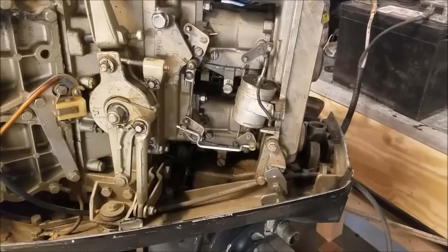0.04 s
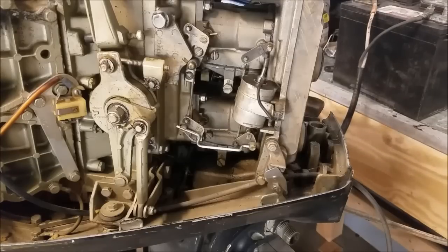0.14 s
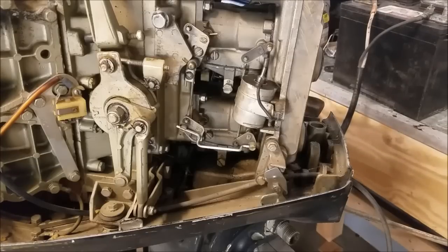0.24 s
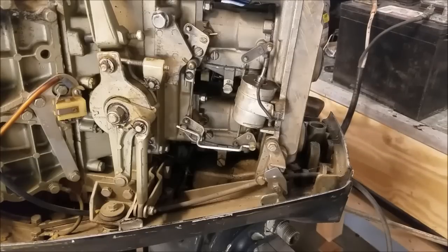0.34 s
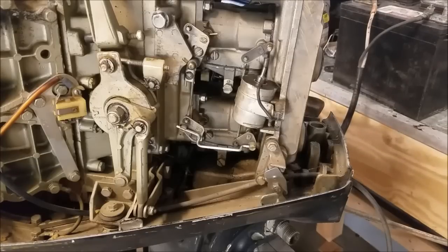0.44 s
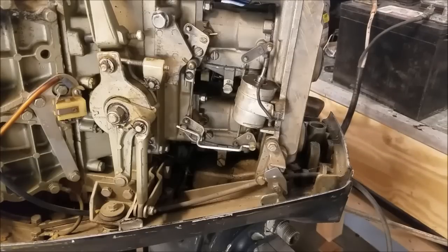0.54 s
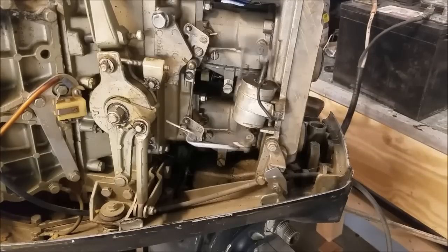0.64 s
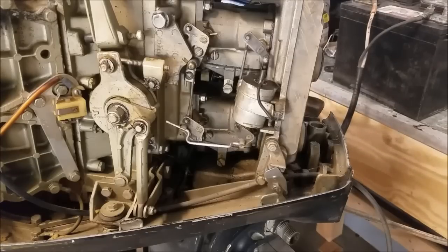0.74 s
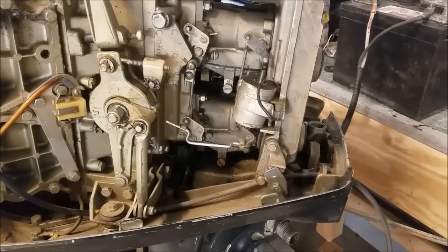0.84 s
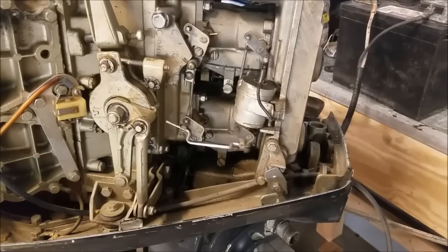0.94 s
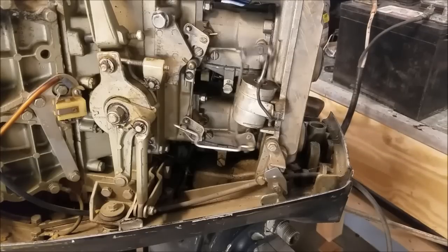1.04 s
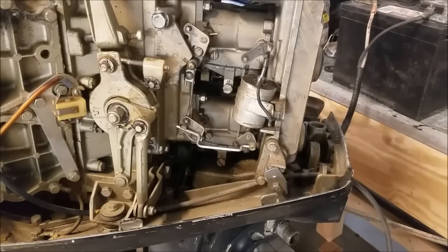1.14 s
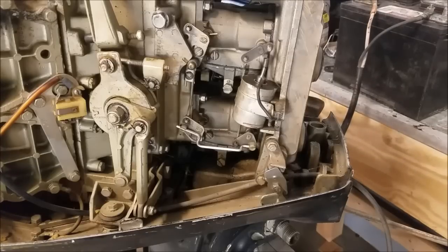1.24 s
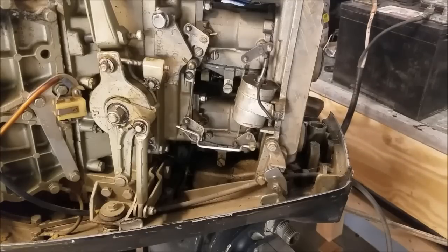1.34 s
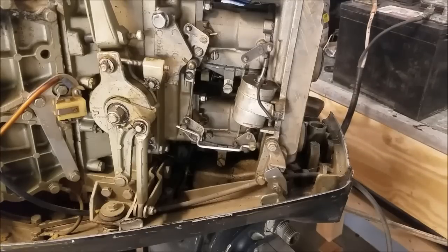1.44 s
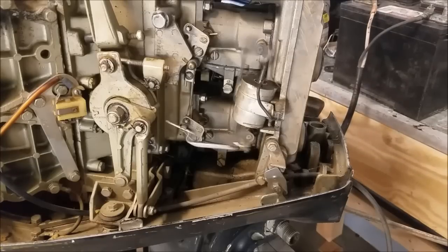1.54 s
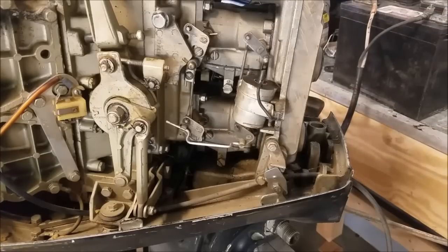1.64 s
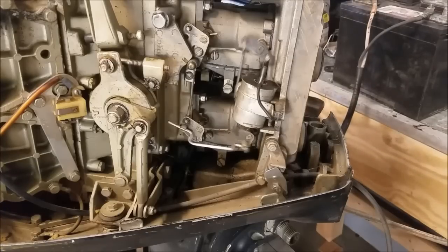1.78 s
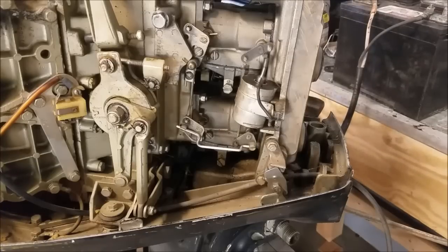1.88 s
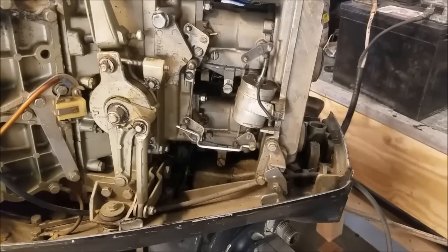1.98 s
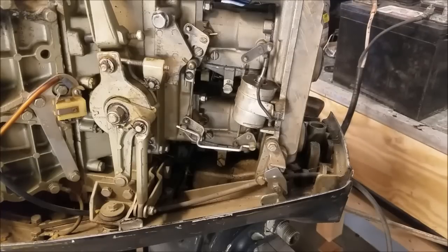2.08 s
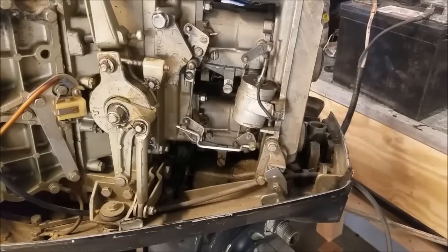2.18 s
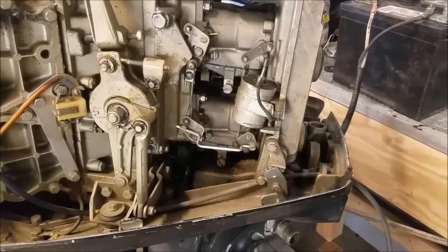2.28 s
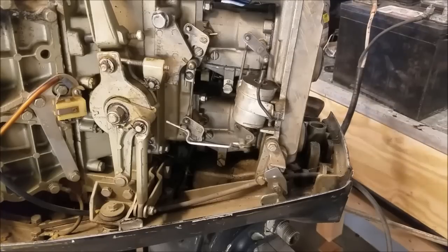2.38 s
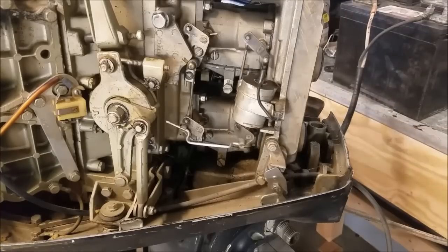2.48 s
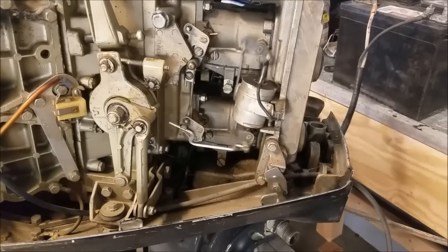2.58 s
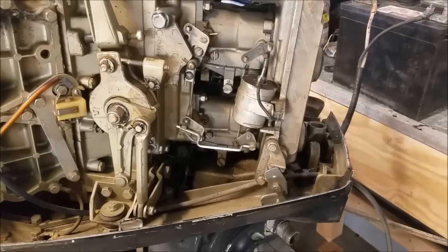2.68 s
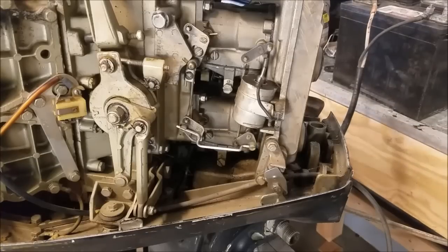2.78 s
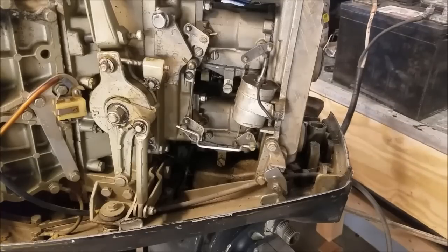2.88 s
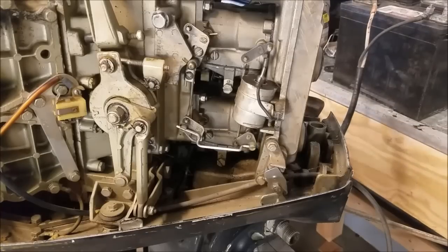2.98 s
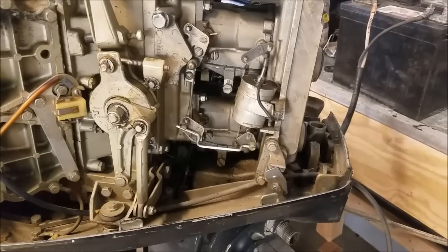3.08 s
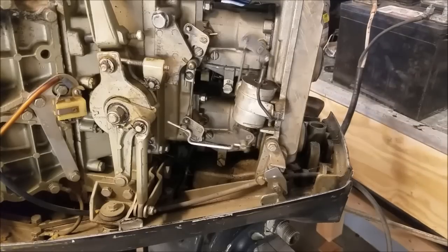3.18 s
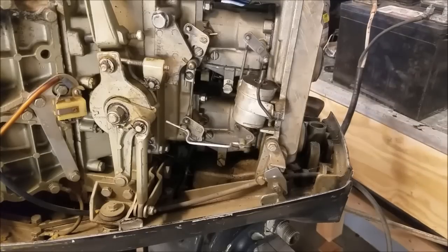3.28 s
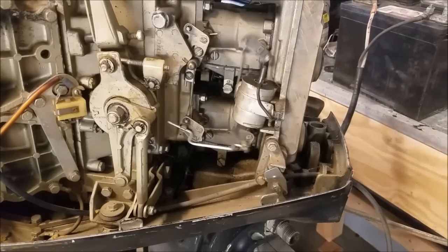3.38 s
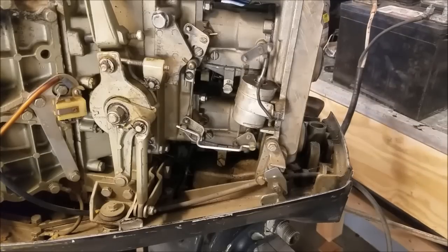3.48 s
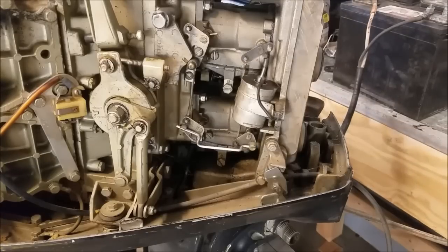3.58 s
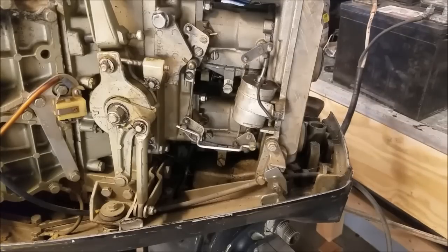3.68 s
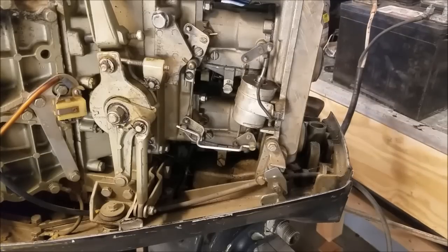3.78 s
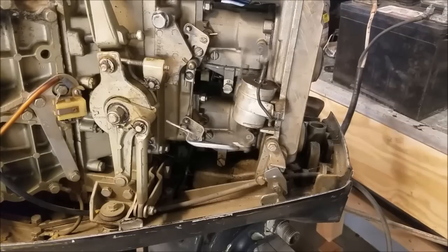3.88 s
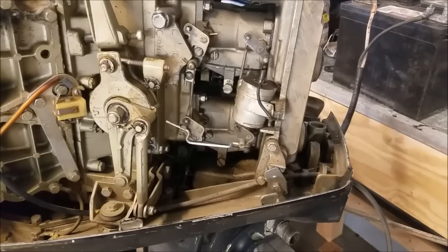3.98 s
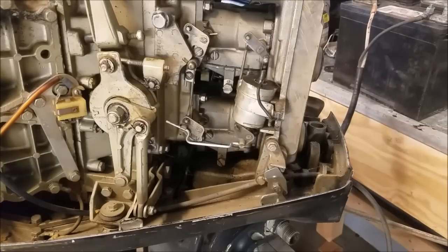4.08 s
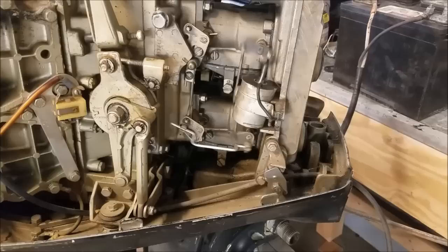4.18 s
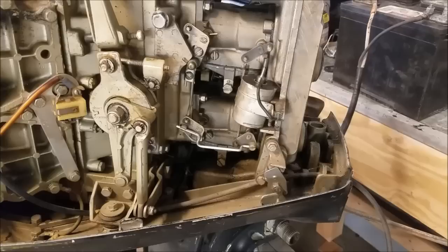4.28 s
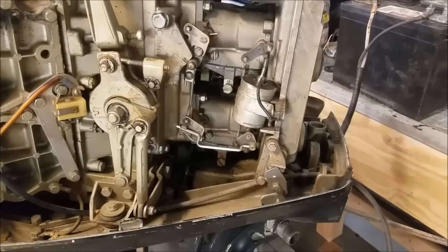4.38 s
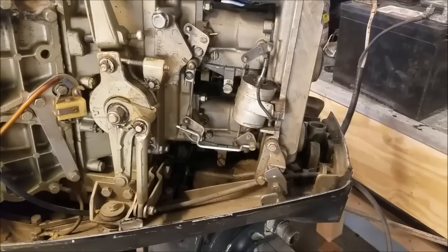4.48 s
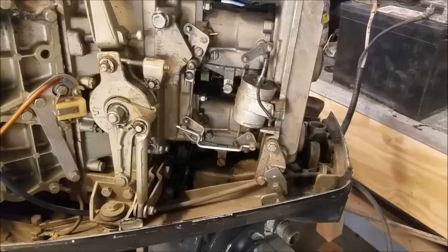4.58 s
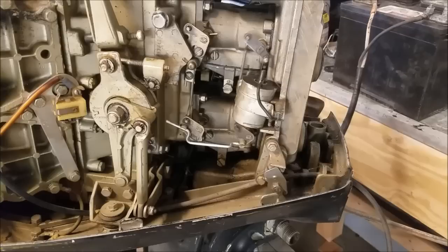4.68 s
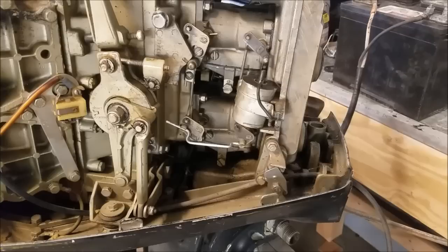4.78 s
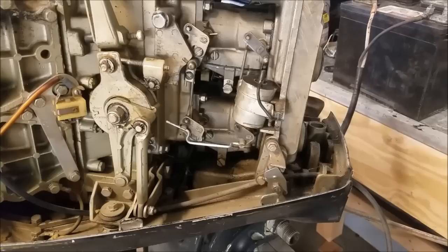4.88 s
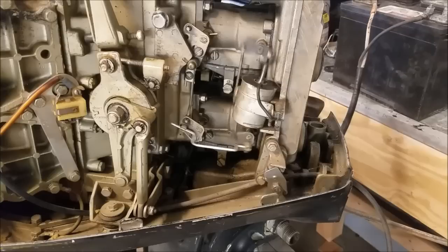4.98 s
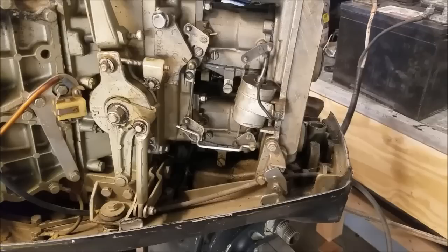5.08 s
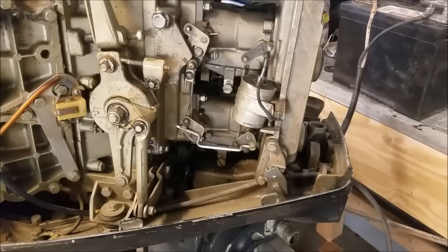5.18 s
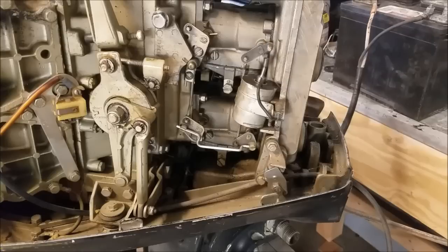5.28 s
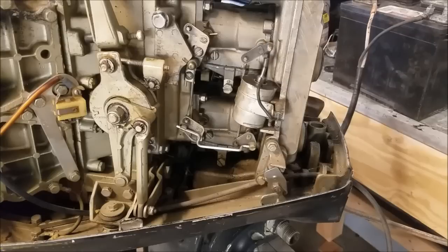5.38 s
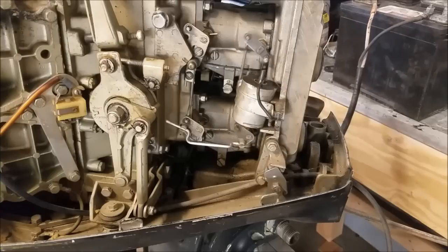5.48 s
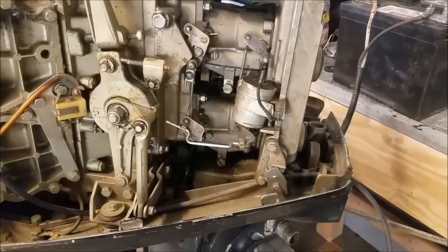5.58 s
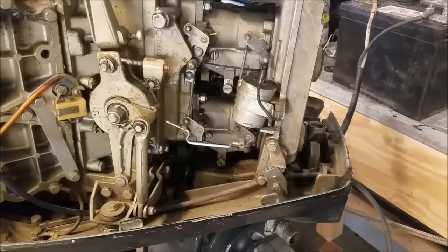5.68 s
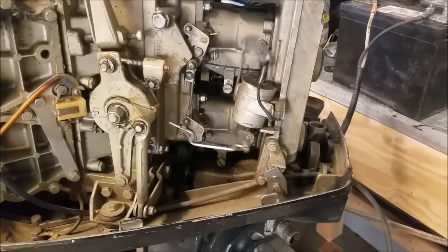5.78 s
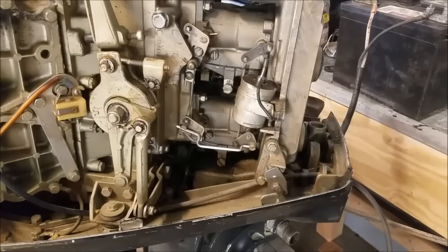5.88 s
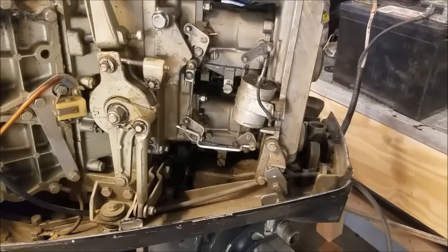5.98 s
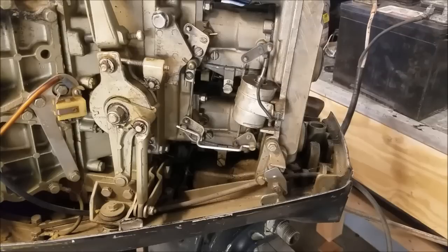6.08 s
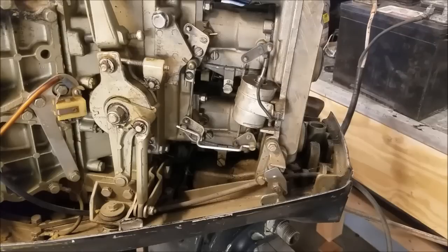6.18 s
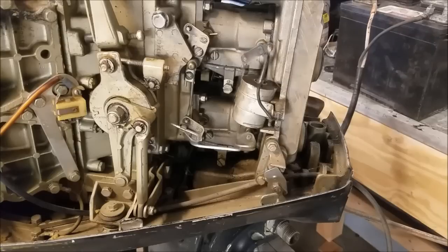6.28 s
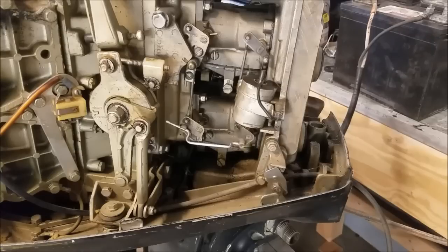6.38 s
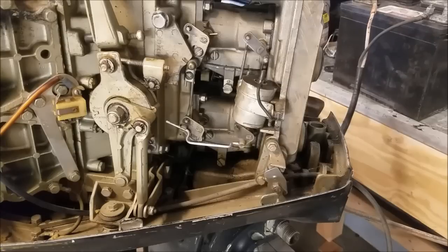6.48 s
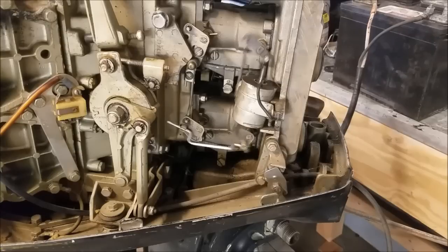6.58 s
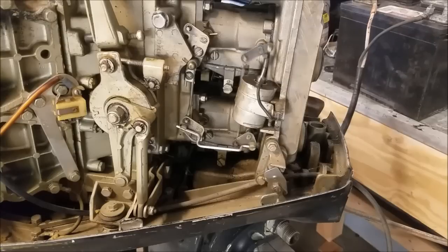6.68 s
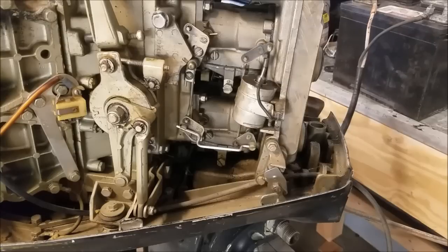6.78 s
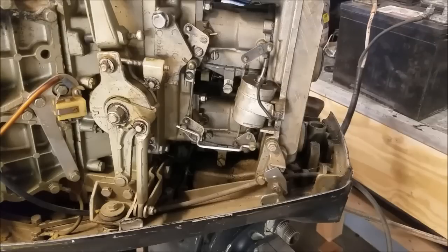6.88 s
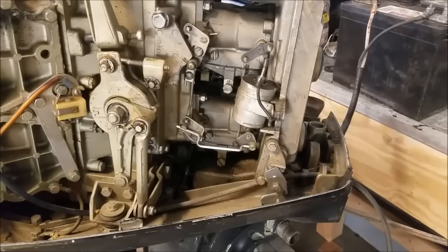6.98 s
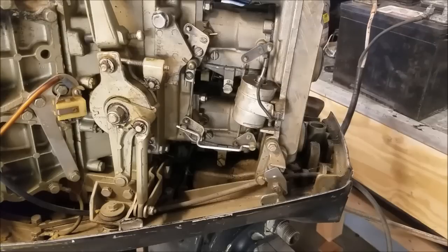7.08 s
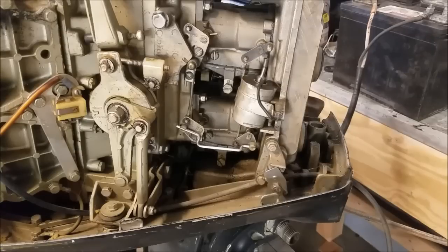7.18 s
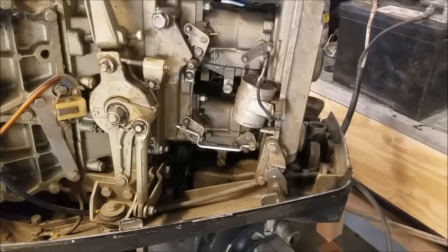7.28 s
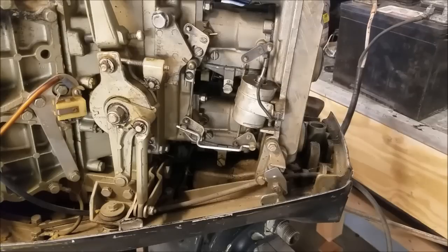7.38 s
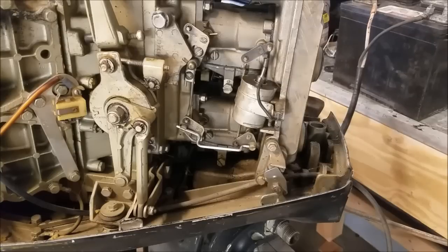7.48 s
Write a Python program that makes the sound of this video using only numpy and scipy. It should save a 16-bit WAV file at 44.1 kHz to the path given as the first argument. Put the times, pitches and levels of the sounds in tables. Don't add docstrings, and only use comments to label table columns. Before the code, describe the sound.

Close to the microphone in a workshop, a linkage on a boat engine clacks loudly, and about 40 milliseconds later its solenoid plunger slams home with a slight rod ring. Between throws come a faint spring return scrape and tiny ticks. An early throw stutters into a rapid cluster amid hand fumbling. Short room echoes follow, over low machine hum and hiss; the end is only faint nail taps and sleeve rustle.

```python
import sys
import numpy as np
from scipy import signal
from scipy.fft import rfft, irfft, next_fast_len
from scipy.io import wavfile
from scipy.ndimage import map_coordinates

SR = 44100
rng = np.random.default_rng(int(sys.argv[2]) if len(sys.argv) > 2 else 0)


def store_wav(level_fs):
    pcm = np.round(np.clip(np.atleast_2d(level_fs), -1, 1) * 32767)
    wavfile.write(sys.argv[1], SR, pcm.T.astype(np.int16))


def nominal_scale(level):
    x = np.asarray(level, float) / 20
    return 10 ** x


N = 332514

# start in seconds, peak in dB, casting tone in dB,
# brightness in dB, bounce strength in dB.
LINKAGE_THROWS = [
    (1.6326, -13.5, -4.5, 1, 0.5),
    (2.428, -14.5, -0.5, 6, -2),
    (3.2331, -14.5, 0, 3.5, -1.5),
    (3.9908, -14.5, 2, 4, -1.5),
    (4.7404, -12.5, -6.5, -2, -1),
    (5.5496, -14.5, 0, 5, 0),
    (6.4069, -14, -2, 0.5, -2.5),
]
ASKEW_THROWS = [
    (.751, -15, -3, -2, 1),
    (2.6226, -16.5, 1, -8, 3.5),
    (2.6613, -13.5, -1.5, 3, -3.5),
    (3.3116, -13, -1.5, -2.5, -8.5),
]
# delay in seconds, level under the blow in dB, casting tone in dB,
# brightness in dB, chatter t60 in seconds.
THROW_BOUNCES = [
    (.0036, -15, -3.5, -0.5, 0.029),
    (.0072, -3.5, 2.5, -1, 0.016),
    (.011, -7, 1.5, 1, .05),
    (.0148, -6, 11, -4, 0.044),
]
ASKEW_BOUNCES = [
    (-.0021, -3, -12.5, 1.7, .015),
    (.0048, -10.5, 4, 0.2, .05),
    (.0085, -6, 7, 2, .04),
]
# frequency in Hz, width in Hz, level in dB.
LINKAGE_MODES = [(358, 59, -9), (456.5, 41, -7.5), (725, 55.5, 2.5), (1178, 29, -5), (1743, 190, -2),
                 (1713, 940, -6.5), (2243, 214, 2), (2433, 470, -1.5), (2597, 345, -3.5), (3083, 120, -7.5),
                 (3637, 300, -13), (5540, 1400, -23.5), (7400, 600, -24), (10600, 7700, -28)]

# start in seconds, peak in dB, casting tone in dB, brightness in dB,
# rebound in dB.
PLUNGER_SLAMS = [
    (.7971, -17, -3.5, -3, 6.5),
    (1.6731, -14, 4, -3, -6.5),
    (2.4697, -14, 3, 0.5, -1.5),
    (2.6789, -14, 3.5, -7.5, -1),
    (3.2741, -16.5, -4.5, -7, 2),
    (4.0319, -14, 0, -0.5, -4.5),
    (4.7804, -11.5, 4.5, -3.5, -2.5),
    (5.5914, -13.5, 3, -1, 1),
    (6.4471, -14, 6, 2, -2),
]
# start in seconds, level in dB, tone in dB, brightness in dB, t60 in seconds.
CONTACT_GRAZE = (2.6150, -23, -8, -4, .02)
PLUNGER_REBOUND = [
    (.0056, -7.5, -6.5, 0.92, .03),
]
# frequency in Hz, width in Hz, level in dB.
PLUNGER_MODES = [(361, 29, -5.5), (734, 70, -2), (950, 55, -6), (1471, 99, -0.5), (1780, 110, -2.5),
                 (2160, 400, -14.5), (3156, 280, -9), (3890, 860, -14.5), (5200, 230, -10.5),
                 (5770, 260, -16), (10550, 630, -24), (10830, 1200, -33.5), (12700, 9600, -20.5)]
# rod peak in dB, rod frequency in Hz, jolt of the engine block in dB.
ROD_AND_BLOCK = [
    (-42, 4760, -33),
    (-25, 4850, -35),
    (-32, 5180, -35),
    (-40, 5070, -50),
    (-34, 4650, -35),
    (-30, 5250, -35),
    (-31, 5180, -30),
    (-26, 5120, -34),
    (-28, 5250, -37),
]

# start in seconds, scrape in dB, travel in seconds, landing in dB,
# spring ring in dB.
SPRING_RELEASES = [
    (1.073, -33, 0.012, -39.5, -6.5),
    (1.851, -34.5, 0.0094, -36, -8),
    (3.457, -41.5, .024, -35.5, -8.5),
    (4.252, -42, .009, -38, -4),
    (5.018, -44, .014, -37, -12),
    (5.85, -41, .011, -36, -6),
    (6.683, -40, 0.0079, -36, -5.5),
]
HALF_SLIP = (2.778, -36, -4.5, 12, .2)
SPRING_SETTLE = [
    (.0095, 2.5, 14, -7.5, 0.029),
    (.022, -8, 13, -6, .04),
]
# frequency in Hz, width in Hz, level in dB.
SCRAPE_MODES = [(973, 2400, -5.5), (2180, 170, -1), (4525, 11000, -10.5), (7790, 1700, -5.5),
                (12500, 11000, -3.5)]
SPRING_MODES = [(752, 190, -8.5), (963, 470, -12.5), (1462, 61, 0), (1620, 70, -13), (2470, 330, -16),
                (3630, 1200, -18.5), (4660, 1800, -22.5), (7160, 3400, -35), (12800, 1700, -27)]
# start in seconds, peak in dB, tone in dB.
LINK_TICKS = [(1.1999, -50.5, 3), (1.9938, -48.5, 14), (3.599, -53, 14), (3.6105, -48, -1),
              (4.3148, -48, -2.5), (4.3881, -50, 4), (5.0268, -39, 12), (5.0584, -39, 7),
              (5.1575, -48.5, 6), (5.9889, -48.5, 0), (6.7445, -48.5, 2), (6.8153, -50.5, 5)]
# frequency in Hz, width in Hz, level in dB.
LINK_MODES = [(800, 280, -4.5), (1702, 64, 2), (3400, 2000, -19.5), (6000, 2300, -41.5)]

# start in seconds, peak in dB, hollow knock in dB, rubbing t60 in seconds.
HAND_TOUCHES = [(1.441, -45, -8.5, 0.39), (1.502, -40, -0.5, 0.72), (1.531, -47, -16.5, 0.6),
                (2.187, -46.5, 1.2, .2), (2.215, -47.5, -3, .24), (2.353, -53, -5, 0.14),
                (2.365, -46, -13, 0.32), (2.413, -42.5, 4, 0.1), (2.72, -40, 6, .24),
                (7.298, -48.5, -2, 0.29), (7.324, -53, -18, 0.26)]
# start in seconds, peak in dB.
NAIL_TAPS = [
    (7.084, -61),
    (7.153, -56),
    (7.258, -57),
]
# frequency in Hz, width in Hz, level in dB.
SWITCH_MODES = [(330, 38, -20.5), (785, 85, -3.5), (892, 110, -2), (1287, 490, -18.5), (3006, 900, -23.5),
                (6300, 3300, -23.5), (12000, 4400, -28.5)]
# loudest moment in seconds, level in dB, rise in dB per second, fall in dB per second.
SLEEVE_MOVES = [
    (2.807, -41.5, 201.5, 148),
    (7.35, -62.5, 30, 11.5),
]
# frequency in Hz, density in dB per Hz.
CLOTH_SPECTRUM = [(470, -21.5), (800, -2.5), (1180, -3.5), (1960, -9.5), (2940, -7), (8850, -23),
                  (15000, -20.5)]

# frequency in Hz, left minus right in dB.
PORT_LEAN = [(60, -4), (92, 1), (140, 9.5), (210, -5), (330, -1.5), (500, -2), (770, -2.5), (1170, -2.5),
             (1790, -0.5), (2740, -4), (4190, -5), (6410, -11), (9810, 9.5), (15000, 0)]
# frequency in Hz, left lead in radians.
PORT_LEAD = [(300, 0.61), (1900, 0.64), (3400, 1), (4500, 0.99), (6500, 2.4), (8300, 0.59), (10000, 2.1),
             (15000, 0.82)]
# frequency in Hz, t60 in seconds.
ROOM_T60 = [(120, 0.99), (400, 0.56), (1000, 0.47), (3000, 0.55), (8000, 0.45), (14000, 0.38)]
# frequency in Hz, level in dB.
ROOM_TONE = [(100, -5.5), (300, 9), (1000, 8.5), (3000, -0.5), (8000, -0.5), (15000, 0)]
# frequency in Hz, left-right likeness from -1 to 1.
ROOM_ALIKE = [(100, 0.99), (500, 0.95), (2000, 0), (5000, 0.45)]
AIR_LIKENESS = [(60, 0.39), (180, 0.97), (550, -0.31), (1650, -0.2), (4970, 0.17), (15000, -0.65)]

# time in seconds, load in dB.
MACHINE_LOAD = [(0.0, -60.5), (0.31, -67.5), (1.97, -60.5), (2.31, -68), (4.37, -58.5), (4.41, -67.5),
                (6.07, -70), (6.13, -78.5), (6.4, -59.5), (7.54, -71.5)]
# frequency in Hz, wander in Hz, level in dB.
MACHINE_TONES = [(74.7, 4, -4), (102, .4, -3.5), (150.7, .4, -5.5), (311, .5, -19)]
TONE_FOLLOWS_LOAD = [0.82, .1, -0.2, -.8]
# frequency in Hz, density in dB per Hz.
RUMBLE_SPECTRUM = [(12, -44.5), (20, -7.5), (48, -6.5), (92, -8), (156, -4.5), (240, -12), (264, -18.5),
                   (412, -13.5), (491, -29.5), (900, -34.5), (1170, -63), (1980, -120)]
HISS_SPECTRUM = [(290, -27.5), (500, -4.5), (595, -10), (709, -5), (908, -11), (1130, -10.5), (1380, -12),
                 (1510, -11.5), (2270, -15), (2480, -16), (7170, -30), (14800, -21.5), (16200, -18)]
# frequency in Hz, left minus right in dB.
RUMBLE_LEAN = [(60, -2.5), (240, -1.5), (950, -3.5), (3770, 1.5), (15000, -1)]
# centre in Hz, width in Hz, depth from 0 to 1.
BODY_DIP = (8400, 924, 0.64)

HALF_DIFFERENCE = np.array([[0.5], [-0.5]])
JOLT_LEAD_S = 0.0012


def unit(x):
    return x / np.sqrt(np.mean(x ** 2) + 1e-20)


def along(points, hz):
    f, v = np.transpose(points)
    return np.interp(np.log(hz + 1), np.log(f + 1), v)


def wobble(rate):
    knots = rng.standard_normal(int(N * rate / SR) + 4)
    return map_coordinates(knots, [np.arange(N) * rate / SR])


def filtered(x, response):
    n = x.shape[-1]
    m = next_fast_len(n + 8192)
    return irfft(rfft(x, m) * response(np.fft.rfftfreq(m, 1 / SR)), m)[..., :n]


def spread(pair, alike, colour):
    def mix(hz):
        angle = np.arccos(np.clip(along(alike, hz), -1, 1)) / 2
        return colour(hz) * [np.cos(angle), np.sin(angle)]
    mid, side = filtered(pair, mix)
    return np.array([mid + side, mid - side])


def strikes(events, modes, tone_hz, lead_s, lead_db, chatter_db, crack_db, rattle_db, spike_db, wall_db, blur,
            span=0.6):
    out, ahead, size = np.zeros((3, N + SR)), 441, 8192
    t, f = (np.arange(size) - ahead) / SR, np.fft.rfftfreq(size, 1 / SR)
    hz, width, db = np.transpose(modes)[:, :, None]
    mode_hz, mode_db = hz[:, 0], db[:, 0]
    sign = (-1) ** np.arange(len(modes))
    tuned = 1j * f * width / (hz * hz - f * f + 1j * f * width)
    blurred = np.abs(f * width / (hz * hz - f * f + 1j * blur * f * width)) ** 2
    treble = 1 / (1 + (4000 / (f + 1)) ** 4)
    delay = np.exp(-2j * np.pi * f * ahead / SR)
    blow = delay * nominal_scale(crack_db * treble)
    share = np.clip(0.53 * f / (f + 350) + 0.26 * treble, 0, 1)
    near = np.exp(-(np.log(mode_hz / tone_hz) / span) ** 2)
    upper = np.clip(np.log2(mode_hz / 2400), 0, 1)
    hardest = max(row[1] for row in events)
    for s, peak_db, tone_db, bright_db, t60 in events:
        grains = unit(rng.standard_normal((3, size)) * nominal_scale(spike_db * rng.standard_normal(size)))
        lead_in = nominal_scale(lead_db) * np.exp(t / lead_s)
        decay = nominal_scale(chatter_db - 60 * np.abs(t) / np.clip(t60, 0.004, 0.25))
        shared, *own = rfft(grains * np.where(t < 0, lead_in, decay))
        chatter = np.sqrt(1 - share ** 2) * shared + share * np.array(own)
        chatter = chatter * nominal_scale(rattle_db * treble)
        dull_db = bright_db + 1.1 * (peak_db - hardest)
        scatter_db = rng.normal(0, 0.99, len(modes))
        gain = sign * nominal_scale(mode_db + scatter_db + tone_db * near + dull_db * upper)
        aspect = nominal_scale(0.41 * rng.standard_normal((2, len(modes))))
        ring = irfft((blow + chatter) * ((gain * aspect) @ tuned), size)
        ring *= nominal_scale(peak_db + 3) / np.max(np.abs(ring.mean(0)))
        wall = irfft(delay * nominal_scale(rattle_db * treble * 1.4) * np.sqrt(gain ** 2 @ blurred), size)
        wall *= nominal_scale(wall_db) * np.linalg.norm(ring[0]) / np.linalg.norm(wall)
        out[:, round(s * SR) - ahead:][:, :size] += np.vstack([ring, wall[None]])
    return out[:, :N]


def bouncing(events, t60, rule):
    rows = []
    for s, db, tone_db, bright_db, after_db in events:
        rows.append((s, db, tone_db, bright_db, t60))
        for delay, less_db, hollow_db, edge_db, rest in rule:
            rows.append((s + delay, db + after_db + less_db, tone_db + hollow_db, bright_db + edge_db, rest))
    return rows


def linkage():
    t60 = 0.033
    throws = bouncing(LINKAGE_THROWS, t60, THROW_BOUNCES) + bouncing(ASKEW_THROWS, t60, ASKEW_BOUNCES)
    return strikes(throws, LINKAGE_MODES, tone_hz=730, lead_s=0.0046, lead_db=-36.5, chatter_db=-18,
                   crack_db=-1.5, rattle_db=-6.5, spike_db=2, wall_db=-12.5, blur=2.5)


def plunger():
    slams = bouncing(PLUNGER_SLAMS, 0.065, PLUNGER_REBOUND) + [CONTACT_GRAZE]
    return strikes(slams, PLUNGER_MODES, tone_hz=753, lead_s=0.0017, lead_db=-22, chatter_db=-27.5,
                   crack_db=-21.5, rattle_db=5.5, spike_db=3.5, wall_db=-14, blur=2.5)


def one_tone(s, db, hz, width, wall_db):
    return strikes([(s, db, 0, 0, 0.02)], [(hz, width, 0)], tone_hz=hz, lead_s=0.0012, lead_db=-40,
                   chatter_db=-20, crack_db=-4.5, rattle_db=-2, spike_db=-2, wall_db=wall_db, blur=2.5)


def rod_and_block():
    out = np.zeros((3, N))
    for slam, (rod_db, rod_hz, jolt_db) in zip(PLUNGER_SLAMS, ROD_AND_BLOCK):
        s = slam[0] - JOLT_LEAD_S
        out += one_tone(s, rod_db - 2, rod_hz, 170, wall_db=-7.5)
        out += one_tone(s, jolt_db + 1.5, 199, 24, wall_db=-14.5)
    return out


def scrape():
    slides = [(s, db, 0, -2, 0.11) for s, db, *_ in SPRING_RELEASES] + [HALF_SLIP]
    return strikes(slides, SCRAPE_MODES, tone_hz=1500, lead_s=0.0023, lead_db=-6, chatter_db=1.5,
                   crack_db=1, rattle_db=-4, spike_db=7.5, wall_db=-2.5, blur=2.5)


def return_spring():
    bright_db = 2.5
    rests = [(s + travel, db, ring_db, bright_db, 0) for s, _, travel, db, ring_db in SPRING_RELEASES]
    landings = bouncing(rests, 0.045, SPRING_SETTLE)
    return strikes(landings, SPRING_MODES, tone_hz=1467, lead_s=0.0037, lead_db=-9, chatter_db=-9.5,
                   crack_db=-4.5, rattle_db=-4, spike_db=2.5, wall_db=-16.5, blur=15, span=0.12)


def slack_link():
    ticks = [(*row, 0, 0.024) for row in LINK_TICKS]
    return strikes(ticks, LINK_MODES, tone_hz=1730, lead_s=0.00086, lead_db=-25, chatter_db=-20.5,
                   crack_db=-14.5, rattle_db=-5.5, spike_db=1.5, wall_db=-12, blur=5)


def hand():
    touches = [(s, db, knock_db, 3, t60) for s, db, knock_db, t60 in HAND_TOUCHES]
    return strikes(touches, SWITCH_MODES, tone_hz=854, lead_s=0.0091, lead_db=-8, chatter_db=-9,
                   crack_db=4.1, rattle_db=-5.5, spike_db=5, wall_db=-10, blur=5.7)


def fingernail():
    taps = [(s, db, -23, -8, 0.042) for s, db in NAIL_TAPS]
    return strikes(taps, SWITCH_MODES, tone_hz=854, lead_s=0.001, lead_db=-19, chatter_db=-7,
                   crack_db=0, rattle_db=-8, spike_db=2.5, wall_db=-12.5, blur=4.5)


def sleeve():
    t, level = np.arange(N) / SR, np.zeros(N)
    for s, db, rise, fall in SLEEVE_MOVES:
        level += nominal_scale(db - np.where(t < s, rise * (s - t), fall * (t - s)))
    cloth = unit(filtered(rng.standard_normal((3, N)), lambda hz: nominal_scale(along(CLOTH_SPECTRUM, hz))))
    return nominal_scale([[-4], [-4], [-12]]) * level * nominal_scale(2.5 * wobble(55)) * cloth


def shop(x):
    out, step = np.zeros((2, N + 2 * SR)), SR // 2
    for start in range(0, N, step):
        hz, t, z = signal.stft(rng.standard_normal((2, 3 * SR // 4)), SR, nperseg=256)
        decay = nominal_scale(-60 * t / along(ROOM_T60, hz)[:, None])
        tail = signal.istft(z * decay, SR, nperseg=256)[1]
        tail *= 1 - np.exp(-np.arange(tail.shape[1]) / SR / 0.0023)
        tail = spread(tail / np.linalg.norm(tail[0]), ROOM_ALIKE, lambda f: nominal_scale(along(ROOM_TONE, f)))
        wet = signal.fftconvolve(x[None, start:start + step], tail, axes=1)
        out[:, start:start + wet.shape[1]] += wet
    return out[:, :N]


def ports(x):
    def response(hz):
        phase = HALF_DIFFERENCE * along(PORT_LEAD, hz)
        return nominal_scale(HALF_DIFFERENCE * along(PORT_LEAN, hz)) * np.exp(1j * phase)
    return filtered(x, response)


def far_machine():
    load_db = np.interp(np.arange(N) / SR, *np.transpose(MACHINE_LOAD))
    load_db = load_db - load_db.mean()
    hum = np.zeros(N)
    for (hz, wander_hz, db), slope in zip(MACHINE_TONES, TONE_FOLLOWS_LOAD):
        phase = 2 * np.pi * np.cumsum(hz + wander_hz * wobble(4)) / SR
        tone = np.sqrt(2) * np.sin(phase) * nominal_scale(2.7 * wobble(7.3))
        hum += tone * nominal_scale(-62 + db + slope * load_db)
    return hum * nominal_scale([[-1.2], [1.2]])


def rumble():
    low = spread(rng.standard_normal((2, N)), AIR_LIKENESS,
                 lambda hz: nominal_scale(along(RUMBLE_SPECTRUM, hz)) / (1 + (hz / 500) ** 4))
    leaned = filtered(low, lambda hz: nominal_scale(HALF_DIFFERENCE * along(RUMBLE_LEAN, hz)))
    return unit(leaned) * nominal_scale(-60 + 2 * wobble(2.3))


def hiss():
    high = spread(rng.standard_normal((2, N)), AIR_LIKENESS, lambda hz: nominal_scale(along(HISS_SPECTRUM, hz)))
    return unit(high) * nominal_scale(-64 + wobble(3.3) / 2)


def scene():
    engine = linkage() + plunger() + rod_and_block() + scrape() + return_spring() + slack_link()
    contacts = engine + hand() + fingernail() + sleeve()
    direct, to_walls = contacts[:2], contacts[2]
    return ports(direct + shop(to_walls)) + far_machine() + rumble() + hiss()


def roll_off(x):
    return signal.sosfilt(signal.butter(12, 16980, fs=SR, output="sos"), x)


def record(dry):
    centre_hz, width_hz, depth = BODY_DIP

    def response(hz):
        dip = 1 - depth / (1 + ((hz - centre_hz) / width_hz * 2) ** 2)
        return dip * np.where(hz < 15850, 1, nominal_scale(-25)) * (hz < 16900)
    mix = filtered(dry, response)
    return roll_off(mix)


dry = scene()
out = record(dry)
store_wav(out)
```